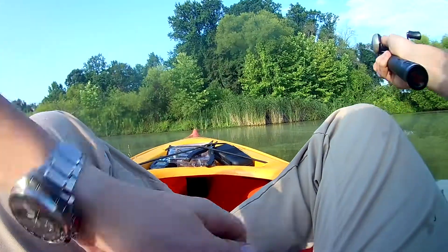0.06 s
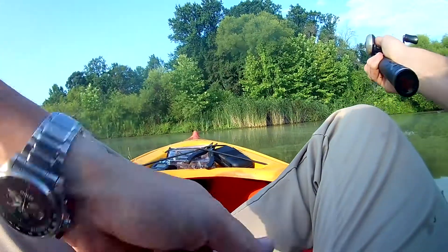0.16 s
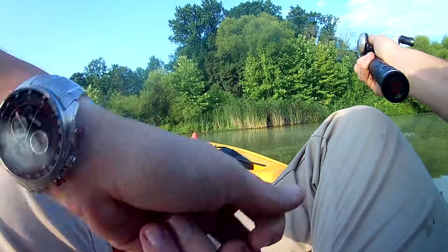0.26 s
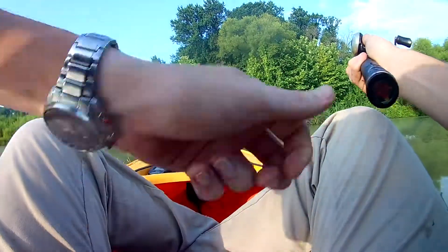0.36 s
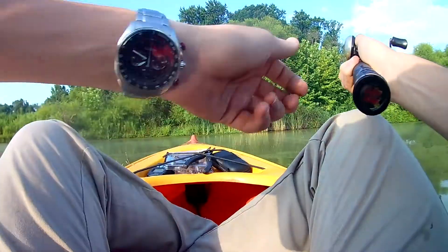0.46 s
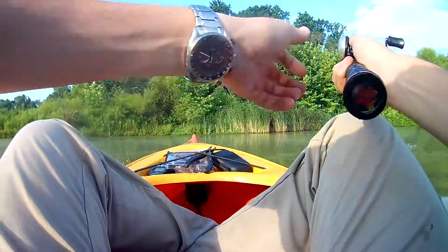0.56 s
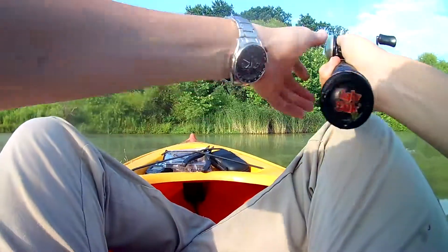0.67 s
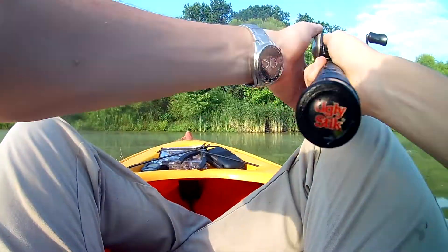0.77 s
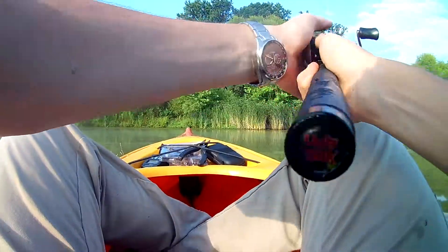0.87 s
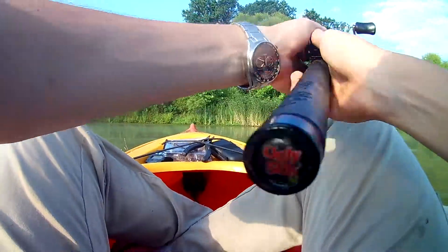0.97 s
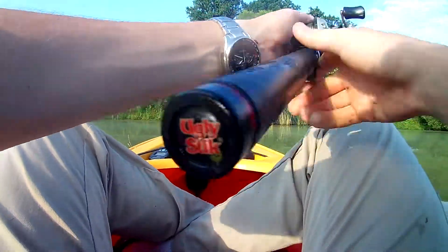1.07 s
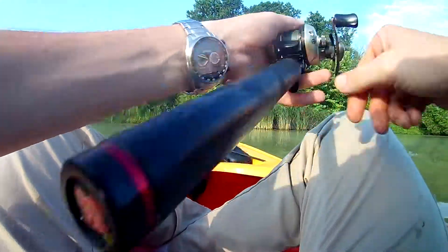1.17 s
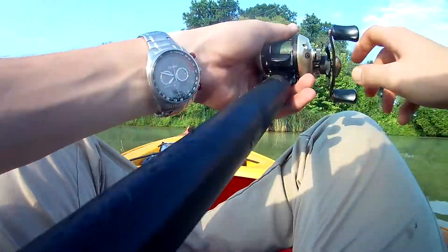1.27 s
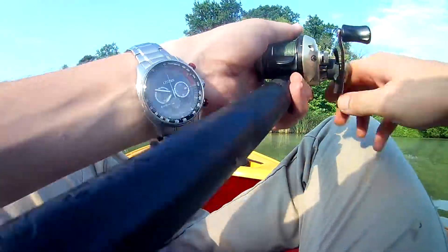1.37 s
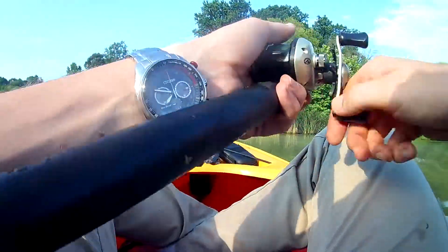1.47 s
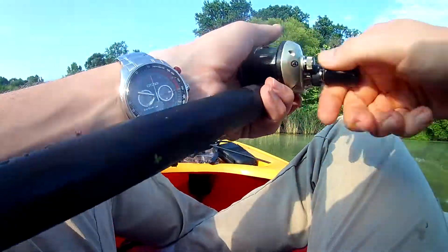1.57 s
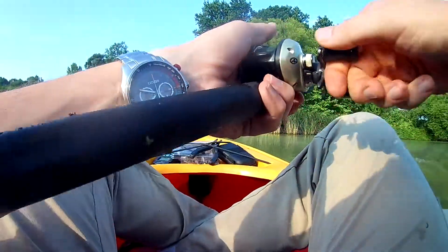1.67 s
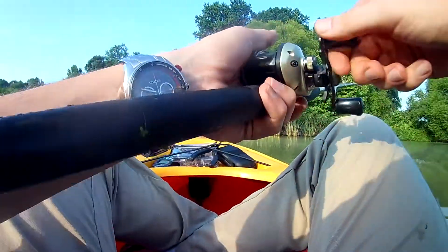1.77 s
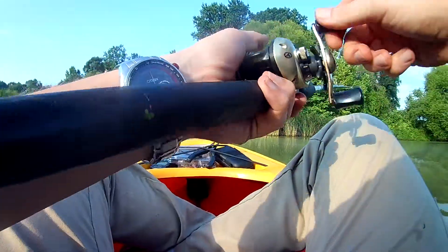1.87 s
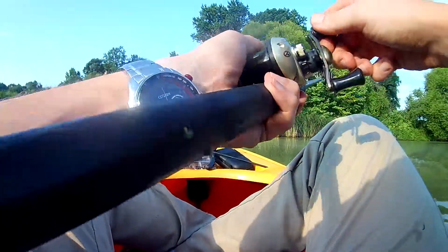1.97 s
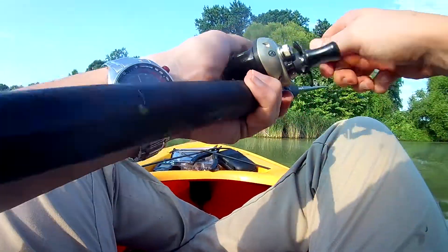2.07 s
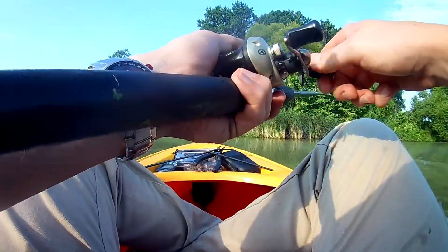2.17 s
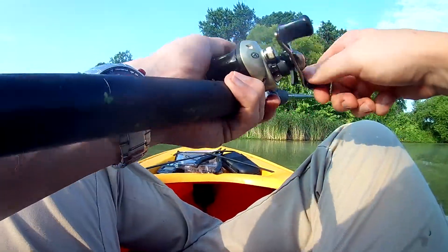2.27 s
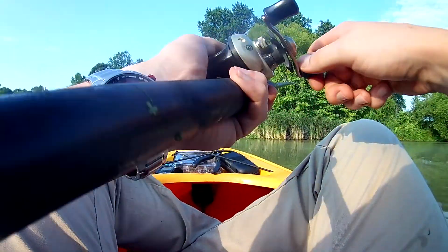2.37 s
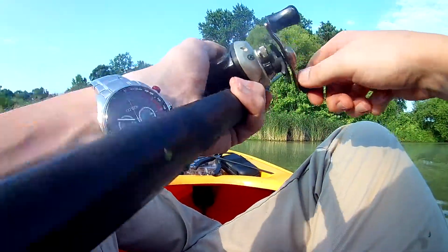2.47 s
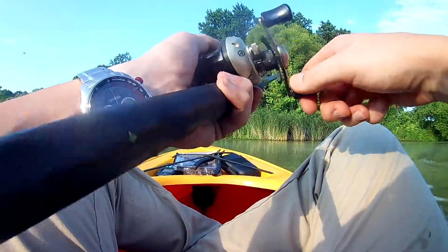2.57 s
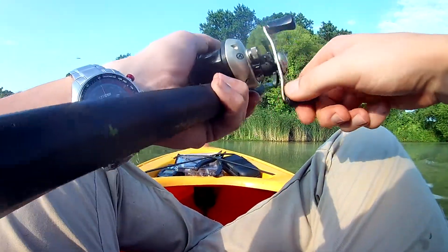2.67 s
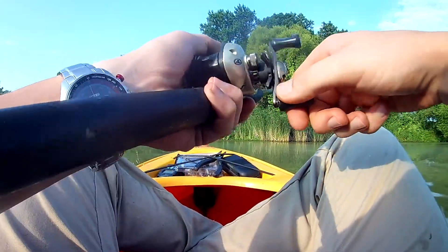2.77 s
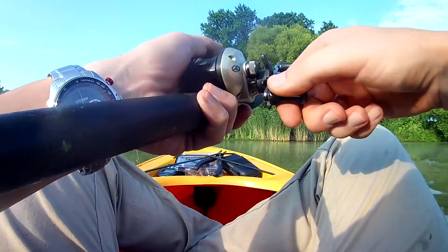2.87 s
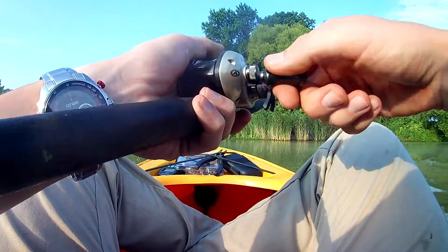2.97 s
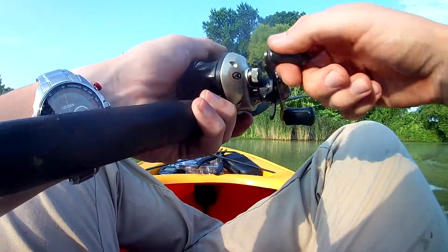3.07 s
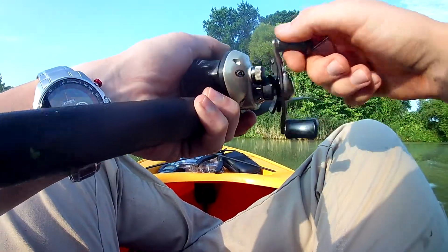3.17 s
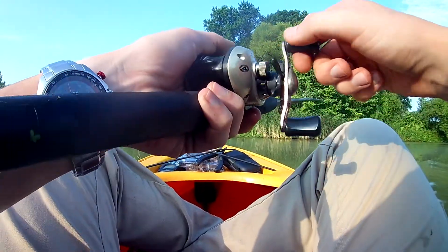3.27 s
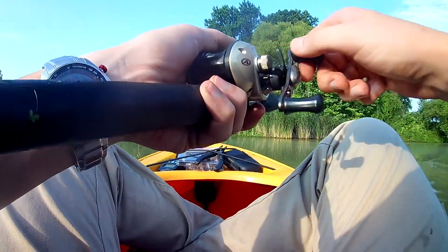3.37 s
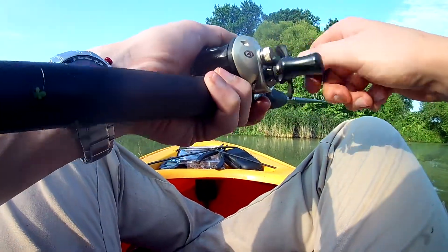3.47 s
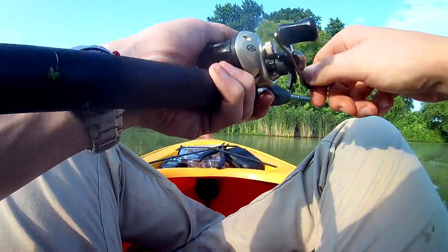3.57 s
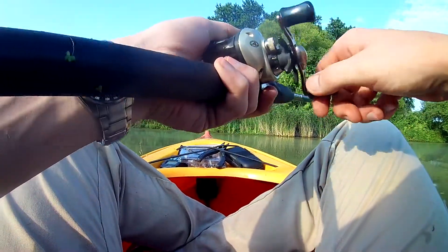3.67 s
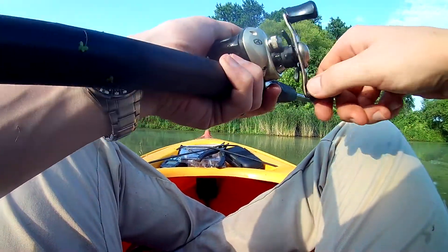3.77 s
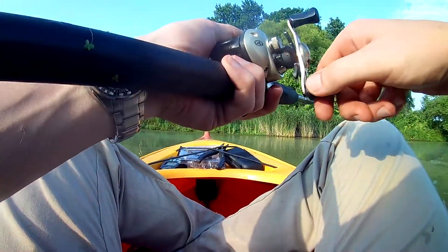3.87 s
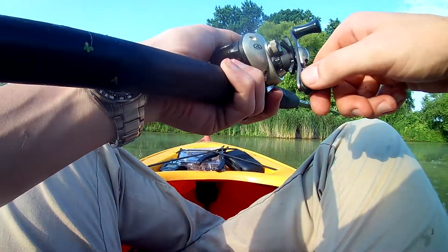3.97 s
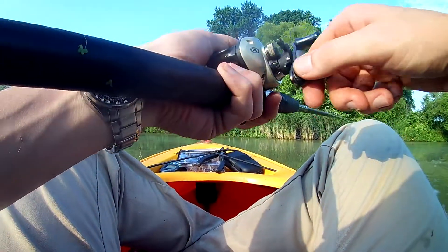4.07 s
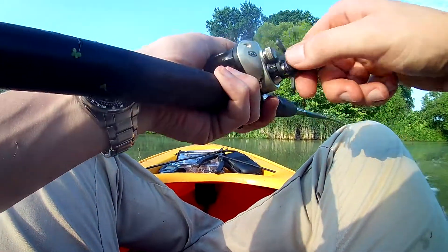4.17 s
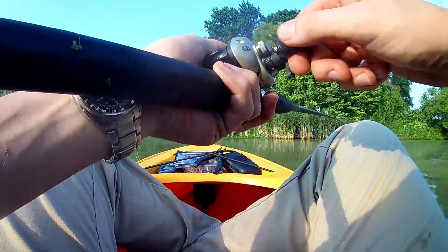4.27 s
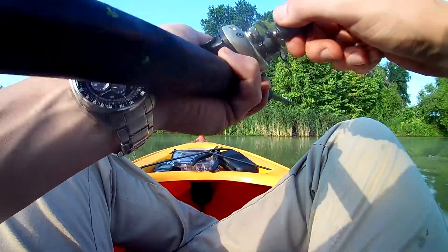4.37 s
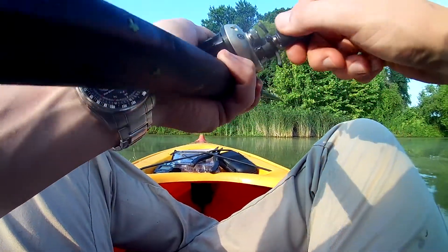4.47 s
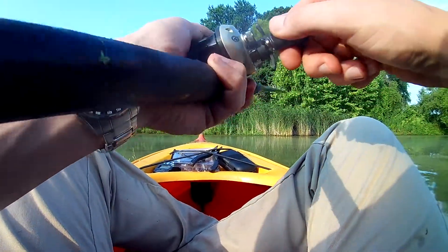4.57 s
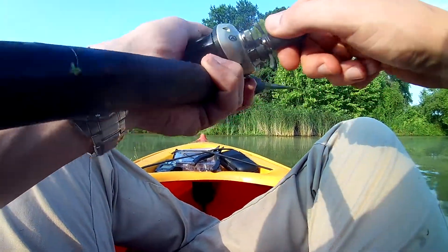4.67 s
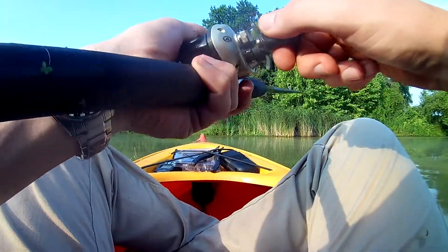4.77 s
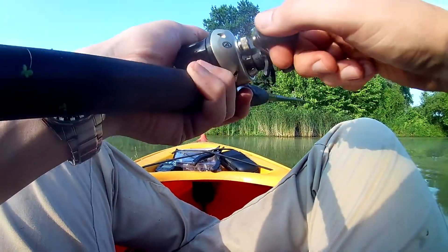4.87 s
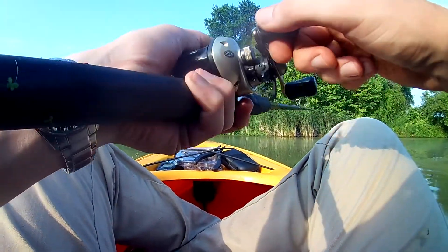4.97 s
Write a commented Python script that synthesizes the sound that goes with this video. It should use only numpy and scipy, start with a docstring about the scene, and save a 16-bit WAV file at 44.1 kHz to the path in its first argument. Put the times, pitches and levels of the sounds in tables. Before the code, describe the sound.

Close to the microphone, hands take up a fishing rod with a light tick, soft rubbing and faint watch strap clinks. The reel snaps once sharply, then its handle ticks unevenly over a soft gear rustle as it is wound. Water plops at the kayak's hull, most clearly near the end. Two distant birds whistle and twitter in the first half, over a faint steady hiss on a still lake.

```python
"""A still lake, heard from a kayak through a body camera's microphone, close to an angler's hands.
The angler takes up a baitcasting rod and winds. The clutch snaps in, the handle ticks and the gears
rustle, all by small blows that ring the reel. Hands and sleeves rub, a watch strap clinks, and bubbles
plop at the hull. Far off, two songbirds whistle over a faint steady hiss, a brighter flickering one
and a low hum."""
import sys
import numpy as np
from scipy import signal
from scipy.fft import rfft, irfft
from scipy.io import wavfile

SR = 44100
rng = np.random.default_rng(int(sys.argv[2]) if len(sys.argv) > 2 else 0)


def transcribe(u):
    """Save the signal u as a 16-bit wav file named by the first command-line argument.

    u: samples, shape (n,) or (channels, n), limited to [-1, 1]; the rate is SR.
    q: integer samples, one column per channel.
    """
    v = np.clip(np.atleast_2d(u).T, -1, 1)
    q = np.round(v * 32767).astype(np.int16)
    wavfile.write(sys.argv[1], SR, q)


N = 220985
TIME = np.arange(N) / SR

# ringing of the reel on its rod, before the hand damps it: pitch_hz, gain_db, t60_s
REEL_RESONANCES = [(233, -14.5, 0.041), (346.5, 0.5, 0.081), (470, 7, 0.08), (530, -2, 0.062),
                   (636, -6.5, 0.067), (813, -2, 0.098), (888, -1.5, 0.11), (1029, -2.5, .053),
                   (1070, 3.5, 0.041), (1160, 0, 0.053), (1243, -7, 0.079), (1385, -2.5, 0.075),
                   (1670, -7.5, 0.055), (1860, -2.5, 0.04), (2040, -6, 0.041), (2127, -1, 0.047),
                   (2214, -3.5, 0.076), (2360, 1, 0.041), (2804, -10.5, 0.053), (3030, 2, 0.023),
                   (3890, 12, .014), (4716, 13, 0.013), (5120, 19, 0.0063), (5696, 5, 0.024),
                   (5700, 3, 0.012), (7200, -7, 0.03), (7340, -5, 0.048), (7740, -30, .06),
                   (9260, -3, 0.069), (9900, -2, .035), (9950, -11, 0.029), (10750, -3, 0.066),
                   (11430, -10, 0.086), (14300, -6, .04)]
# parts of the clutch landing and bouncing: start_s, level_db, tone_hz
CLUTCH_CONTACTS = [(1.5425, -16.5, 866), (1.5436, -19.5, 2240), (1.5443, -13.5, 5170),
                   (1.5454, -18.5, 3940), (1.5458, -31, 7260), (1.5463, -18, 5370), (1.5466, -21, 1250),
                   (1.5555, -25, 755), (1.5589, -29.5, 5170), (1.5608, -27, 1300), (1.5622, -44, 9500),
                   (1.5708, -44, 5200)]
# play in the handle being taken up: start_s, knock_db, click_db, click_hz
HANDLE_TICKS = [(0.0234, -41.5, -51, 1350), (1.443, -66, -49, 1900), (1.468, -44.5, -55, 1640),
                (1.504, -39.5, -42, 1920), (1.65, -51, -54, 2180), (1.7062, -58, -56, 2180),
                (1.714, -51, -45.5, 1980), (1.73, -49, -48, 2040), (1.779, -75, -51.5, 1990),
                (1.9266, -56, -47, 2260), (2.042, -47.5, -47, 3130), (2.272, -54.5, -72, 2100),
                (2.396, -52, -58, 1590), (2.542, -55, -61, 1540), (2.559, -50, -63, 1500),
                (2.579, -57, -60, 1400), (2.657, -57, -60, 1460), (4.3453, -46.5, -50.5, 2090),
                (4.3844, -41, -44, 2200), (4.3875, -40, -43, 2200), (4.6642, -57, -54.5, 2290),
                (4.8807, -48, -58, 2100)]
# gear rustle as the hand finds the handle and winds: time_s, level_db
GEAR_LEVELS = [(1.2, -73), (1.45, -67.5), (1.6, -62), (1.8, -71.5), (2.4, -74.5), (2.7, -74.5),
               (3.0, -73.5), (5, -88)]
# contacts of the gear teeth: tone_hz, gain_db
GEAR_CONTACTS = [(1200, -4), (2150, 4)]
# links of the watch strap meeting: start_s, level_db, tone_hz
STRAP_CLINKS = [(.0225, -53.5, 5960), (.207, -52.5, 5530), (.221, -50, 5800), (.273, -56, 5800),
                (.332, -58, 5900), (.433, -67, 6440)]
# skin, cloth and strap sliding: start_s, length_s, centre_hz, width_octaves, level_db
GRIP_RUBS = [(0.002, 0.018, 1010, 1.34, -56.5), (0.029, 0.024, 1290, 0.37, -57.5),
             (0.18, 0.063, 880, 0.79, -57), (0.192, 0.071, 11960, 0.12, -70),
             (1.031, 0.05, 2300, 0.76, -63.5), (1.047, 0.1, 760, 0.55, -55), (1.043, 0.18, 240, 2.9, -51),
             (2.53, 0.073, 990, 1.23, -64), (3.041, 0.11, 840, 1, -70), (3.645, 0.15, 2390, 0.38, -70),
             (4.864, 0.055, 900, 0.65, -65)]
# air pockets closing at the hull: start_s, pitch_hz, level_db, t60_s, rise_octaves_per_s
HULL_BUBBLES = [(2.5570, 616, -42, 0.04, 5.9), (3.068, 598, -66, 0.32, 0.91),
                (3.106, 573, -53.5, 0.33, 4.2), (4.610, 219, -48, 0.15, 20),
                (4.6245, 483, -21, 0.012, 0.55), (4.626, 308, -32.5, 0.13, 8.8),
                (4.880, 522, -56.5, 0.31, 2.2), (4.888, 920, -55, 0.064, 13), (4.910, 1110, -63, 0.28, 4)]
# slurs of the distant birds, up or down; the first three rows are higher wisps of the twittering bird: start_s,
# length_s, first_hz, last_hz, level_db
SONG_SLURS = [(.745, 0.083, 5450, 5750, -65), (.875, 0.049, 5550, 5300, -63), (.94, 0.055, 4550, 4350, -63),
              (1.653, 0.039, 3610, 4550, -64), (1.862, .058, 3370, 4550, -65),
              (2.075, 0.052, 3500, 3200, -72), (2.143, .042, 4650, 3950, -65),
              (2.178, 0.038, 3850, 5400, -69), (2.3, 0.053, 3650, 4740, -70),
              (2.325, .042, 3750, 3300, -70), (2.39, 0.053, 5310, 4200, -71), (2.43, .052, 4230, 5600, -66),
              (2.555, 0.048, 4550, 4600, -65), (2.646, .034, 5350, 3400, -64),
              (2.686, 0.047, 5000, 4200, -68), (2.768, 0.094, 3380, 3620, -65)]
# spectrum of the steady hiss: frequency_hz, gain_db
HISS_SPECTRUM = [(20, -0.5), (55, 2.5), (170, 2), (450, -3.5), (1050, -8.5), (1800, -21.5), (2500, -18),
                 (3250, -21), (3900, -11.5), (5600, -12.5), (6600, -39), (7450, -46), (7850, -42.5),
                 (15500, -43.5)]
# spectrum of the brighter hiss: frequency_hz, gain_db
SIZZLE_SPECTRUM = [(1500, -27), (2700, 3.5), (3250, -5.5), (3800, 5.5), (4400, -3.5), (5400, 9),
                   (6300, -0.5), (7150, -7.5), (7450, -1.5), (7850, -25), (12000, -29), (15000, -50)]
# the brighter hiss swelling twice, then fading: time_s, level_db
SIZZLE_LEVELS = [(0, -64), (.5, -67), (.72, -69), (.9, -64), (1.12, -67), (1.5, -67.5), (1.68, -67),
                 (1.86, -67), (2.0, -67.5), (2.6, -68.5), (2.85, -69), (5, -71)]


def clutch():
    """Close to the microphone the clutch snaps in once; its parts land in turn and bounce."""
    return ring_reel(CLUTCH_CONTACTS, octaves=0.58, spill_db=-18.5, t60_scale=0.82,
                     crack_db=-40, crack_t60_s=0.018, contact_s=0.0001, mode_ratio=-1)


def ring_reel(contacts, octaves, spill_db, t60_scale, crack_db, crack_t60_s, contact_s, mode_ratio):
    """Each contact rings the reel's modes near its own tone; a grip (t60_scale < 1) shortens the ring."""
    out, t = np.zeros(N), TIME[:SR // 5]
    hz, mode_db, t60_s = np.transpose(REEL_RESONANCES)
    modes = np.sin(2 * np.pi * np.outer(hz, t)) * decay(t, t60_scale * t60_s[:, None])
    # a ratio of -1 starts neighbouring modes opposed; just under 1, in step and weaker going up
    mode_gain = mode_ratio ** np.arange(len(hz)) * undb(mode_db)
    attack = 1 - np.exp(-t / contact_s)
    for start_s, level_db, tone_hz in contacts:
        near_tone = np.exp(-0.5 * (np.log2(hz / tone_hz) / octaves) ** 2)
        spill = undb(spill_db) * (hz < tone_hz)  # through the frame into the lower modes
        body = attack * (((near_tone + spill) * mode_gain) @ modes)
        crack = attack * noise_burst(t, tone_hz, 2 * octaves, crack_t60_s)  # loose parts chatter
        add(out, start_s, undb(level_db) * (body / np.abs(body).max() + undb(crack_db) * crack))
    return out


def handle(knock_hz=1170, thud_hz=440, thud_loss_db=12, click_lag_s=0.0006):
    """Each tick of the handle is a knock, a weaker thud down the rod and a brighter click just after."""
    knocks = [(s, db, knock_hz) for s, db, _, _ in HANDLE_TICKS]
    thuds = [(s, db - thud_loss_db, thud_hz) for s, db, _, _ in HANDLE_TICKS]
    clicks = [(s + click_lag_s, db, hz) for s, _, db, hz in HANDLE_TICKS]
    dull = ring_reel(knocks + thuds, octaves=0.26, spill_db=-18, t60_scale=0.5,
                     crack_db=-17, crack_t60_s=0.025, contact_s=0.00025, mode_ratio=0.95)
    bright = ring_reel(clicks, octaves=0.096, spill_db=-36, t60_scale=0.43,
                       crack_db=-14, crack_t60_s=0.048, contact_s=0.0006, mode_ratio=0.85)
    return dull + bright


def gears(touches_per_s=220):
    """Gear teeth touch lightly at uneven moments; the reel's ringing blends them into a soft rustle."""
    touches = (rng.random(N) < touches_per_s / SR) * rng.standard_normal(N)
    ring = ring_reel([(0, db, hz) for hz, db in GEAR_CONTACTS], octaves=0.56, spill_db=-31, t60_scale=1,
                     crack_db=-16, crack_t60_s=0.045, contact_s=0.00014, mode_ratio=0.83)
    rustle = unit(signal.fftconvolve(touches, ring[:SR // 5])[:N])
    return rustle * undb(np.interp(TIME, *np.transpose(GEAR_LEVELS)))


def watch_strap():
    """Strap links clink as the wrist turns, voiced with the same resonances as the reel."""
    return ring_reel(STRAP_CLINKS, octaves=0.17, spill_db=-7, t60_scale=0.42,
                     crack_db=-2.5, crack_t60_s=0.072, contact_s=0.0004, mode_ratio=-1)


def rubs(rise_share=0.35, swish_start_s=1.506, swish_db=-40):
    """Hands and sleeves slide near the microphone. Apart from them, a brief swish swells and fades around the
    snap of the clutch."""
    out = np.zeros(N)
    for start_s, length_s, hz, octaves, level_db in GRIP_RUBS:
        rub = slide(rise_share * length_s, (1 - rise_share) * length_s, hz, octaves, curve=0.7)
        add(out, start_s, undb(level_db) * rub)
    swish = slide(rise_s=0.038, fall_s=0.036, hz=1450, octaves=4.3, curve=1.2)
    add(out, swish_start_s, undb(swish_db) * swish)
    return out


def slide(rise_s, fall_s, hz, octaves, curve, spread_db=1.5):
    """Friction: dense tiny slips of uneven size swell and die away with the pressure."""
    t = TIME[:SR // 2]
    slips = rng.standard_normal(len(t)) * undb(spread_db * wander(190)[:len(t)])
    pressure = np.interp(t, [0, rise_s, rise_s + fall_s], [0, 1, 0]) ** curve
    return pressure * unit(band(slips, hz, octaves))


def plops(close_s=0.0028, life_s=0.044, slap_db=-18.5):
    """Water slaps the hull; each trapped bubble rings, rising in pitch until it dies at the surface."""
    out, t = np.zeros(N), TIME[:SR // 8]
    for start_s, hz, level_db, t60_s, rise in HULL_BUBBLES:
        bubble = sine(hz * 2 ** (rise * t))
        envelope = (1 - np.exp(-t / close_s)) * decay(t, t60_s) * np.exp(-(t / life_s) ** 4)
        slap = noise_burst(t, 1.47 * hz, octaves=1.65, t60_s=0.092)
        add(out, start_s, undb(level_db) * envelope * (bubble + undb(slap_db) * slap))
    return out


def birds():
    """Far from the kayak, one bird whistles cleanly in the open; another twitters deep in the trees."""
    song = whistles(SONG_SLURS, warble_octaves=0.006, warble_per_s=200,
                    flutter_db=2, echo_db=-12, echo_t60_s=0.4)
    twitter = whistles(trill_notes(), warble_octaves=0.055, warble_per_s=600,
                       flutter_db=5, echo_db=-4, echo_t60_s=0.3)
    return song + twitter


def trill_notes(count=14, first_s=0.654, period_s=0.0915, chip_s=0.023, centre_hz=5330):
    """The second bird's evenly paced falling chips, never quite alike, with softer rising ones between."""
    sweep_octaves, scatter_octaves = 0.305, 0.07
    level_db, scatter_db, softer_db = -60.5, 3, 5.5
    notes = []
    for k, (pitch, effort) in enumerate(rng.uniform(-1.04, 1, (count, 2))):
        start_s = first_s + k * period_s
        chip_db = level_db + scatter_db * effort
        high, low = centre_hz * 2 ** (scatter_octaves * pitch + sweep_octaves * np.array([0.5, -0.5]))
        notes.append((start_s, chip_s, high, low, chip_db))
        notes.append((start_s + period_s / 2, chip_s, low, high, chip_db - softer_db))
    return notes


def whistles(notes, warble_octaves, warble_per_s, flutter_db, echo_db, echo_t60_s, arch_octaves=0.0585):
    """Thin gliding whistles, broken up by the moving air and smeared by the trees on the bank."""
    direct = np.zeros(N)
    for start_s, length_s, first_hz, last_hz, level_db in notes:
        progress = np.linspace(0, 1, int(length_s * SR))
        arch = np.abs(np.sin(np.pi * progress))
        glide_hz = first_hz * (last_hz / first_hz) ** progress
        warble = warble_octaves * wander(warble_per_s)[:len(progress)]
        tone = sine(glide_hz * 2 ** (arch_octaves * arch + warble))
        add(direct, start_s, undb(level_db) * np.sqrt(arch) * tone)
    direct *= np.minimum(undb(flutter_db * wander(90)), 1)
    trees = rng.standard_normal(SR) * decay(TIME[:SR], echo_t60_s)
    echo = signal.fftconvolve(direct, trees / np.linalg.norm(trees))[:N]
    return direct + undb(echo_db) * echo


def hiss(level_db=-62):
    """A faint steady hiss lies behind everything."""
    return colour(rng.standard_normal(N), HISS_SPECTRUM) * undb(level_db + 0.039 * wander(8.8))


def hum(pitch_hz=119.5, level_db=-74.5):
    """A low hum wavers slightly in pitch and level."""
    tone = np.sqrt(2) * sine(pitch_hz + 1.51 * wander(4.5))
    return tone * undb(level_db + 1.5 * wander(2))


def sizzle(flicker_db=5, settle_s=3.8):
    """A brighter hiss whose narrow bands flicker each on their own, then settle."""
    depth_db = flicker_db * np.exp(-(TIME / settle_s) ** 2)
    bands = sum(undb(depth_db * wander(90)) * band(rng.standard_normal(N), hz, octaves=1 / 7)
                for hz in np.geomspace(2000, 14000, 20))
    level_db = np.interp(TIME, *np.transpose(SIZZLE_LEVELS)) + 0.11 * depth_db * wander(120)
    return colour(bands, SIZZLE_SPECTRUM) * undb(level_db)


def undb(db):
    """Decibels to gain."""
    return 10 ** (np.asarray(db) / 20)


def unit(x):
    """Scale to rms 1."""
    return x / np.sqrt(np.mean(x ** 2))


def add(out, start_s, sound):
    """Mix a sound in at start_s."""
    i = int(np.clip(round(start_s * SR), 0, N))
    out[i:i + len(sound)] += sound[:N - i]


def sine(hz):
    """A tone that follows a changing pitch."""
    return np.sin(2 * np.pi * np.cumsum(hz) / SR)


def decay(t, t60_s):
    """An envelope that falls 60 dB in t60_s."""
    return np.exp(-np.log(1000) * t / t60_s)


def band(x, hz, octaves):
    """Steep band-pass around hz."""
    edges = np.minimum(hz * 2 ** (np.array([-0.5, 0.5]) * octaves), [0.4 * SR, 0.45 * SR])
    return signal.sosfilt(signal.butter(3, edges, "bandpass", fs=SR, output="sos"), x)


def noise_burst(t, hz, octaves, t60_s):
    """A band of noise dying away."""
    return unit(band(rng.standard_normal(len(t)), hz, octaves)) * decay(t, t60_s)


def colour(x, spectrum):
    """Filter by a curve of (frequency_hz, gain_db) points and scale to rms 1."""
    hz, db = np.transpose(spectrum)
    bins_hz = np.maximum(np.fft.rfftfreq(N, 1 / SR), 1)
    gain = undb(np.interp(np.log(bins_hz), np.log(hz), db))
    return unit(irfft(rfft(x) * gain, N))


def wander(steps_per_s):
    """Random drift with a spread near 1; it holds still after its last step."""
    steps = rng.standard_normal(1024)
    return np.interp(TIME * steps_per_s, np.arange(len(steps)), steps)


def scene():
    """The angler close by and the lake around, in open air, on one channel."""
    lake = hiss() + hum() + sizzle() + plops() + birds()
    angler = clutch() + watch_strap() + handle() + gears() + rubs()
    return (angler + lake)[None]


def record(dry):
    """The body camera cuts the top treble steeply."""
    top_hz = 15700
    return signal.sosfilt(signal.ellip(8, 0.2, 70, top_hz, fs=SR, output="sos"), dry)


dry = scene()
out = record(dry)
transcribe(out)
```